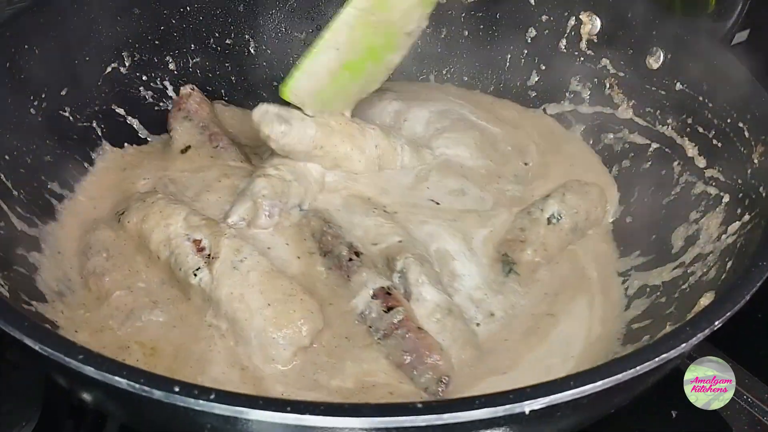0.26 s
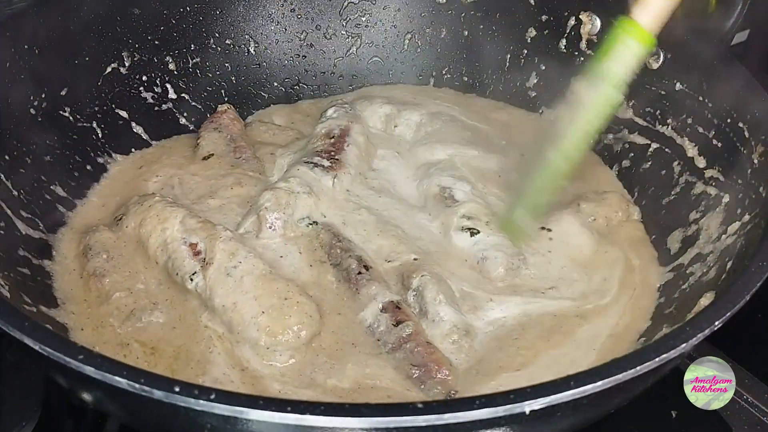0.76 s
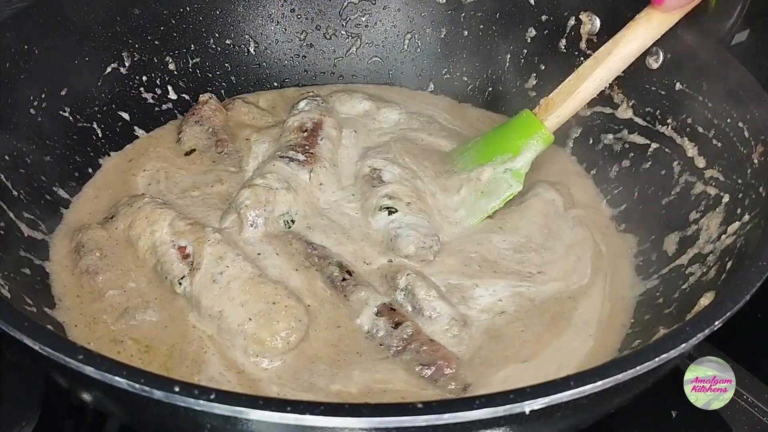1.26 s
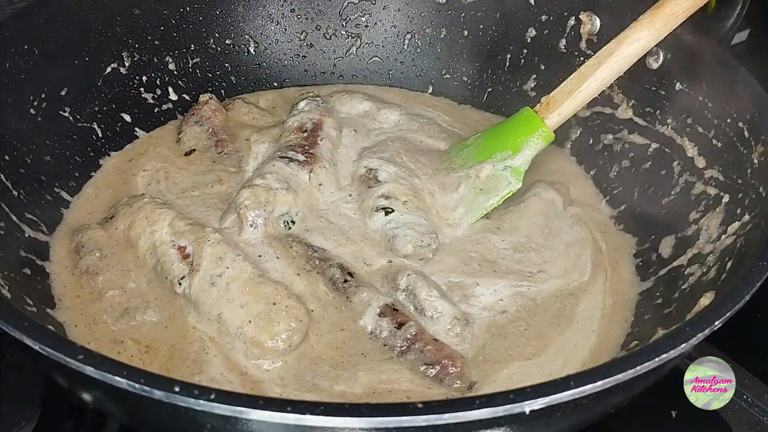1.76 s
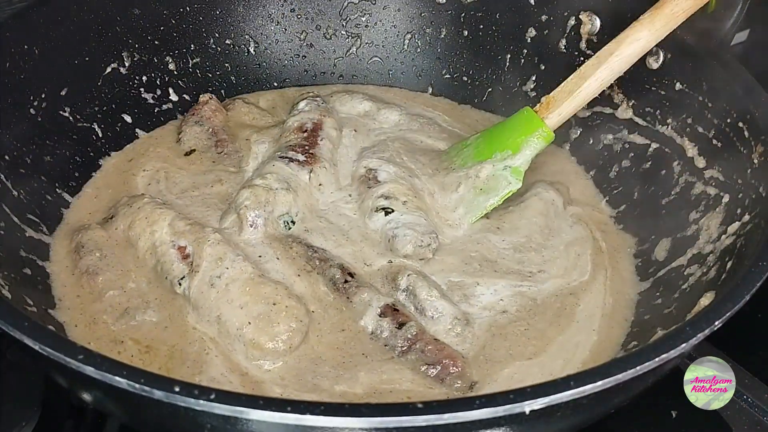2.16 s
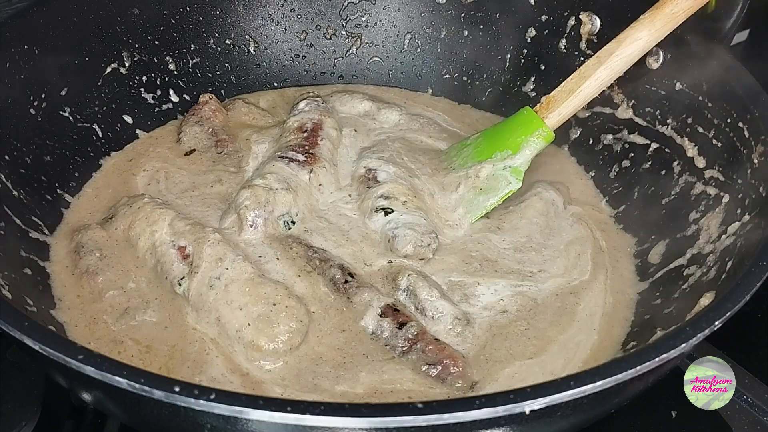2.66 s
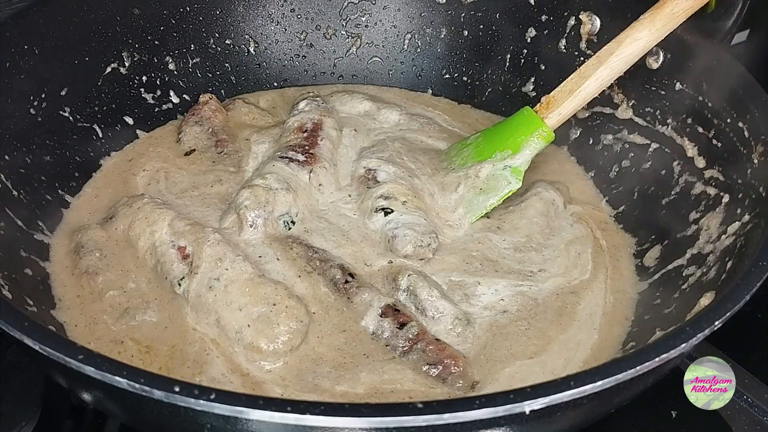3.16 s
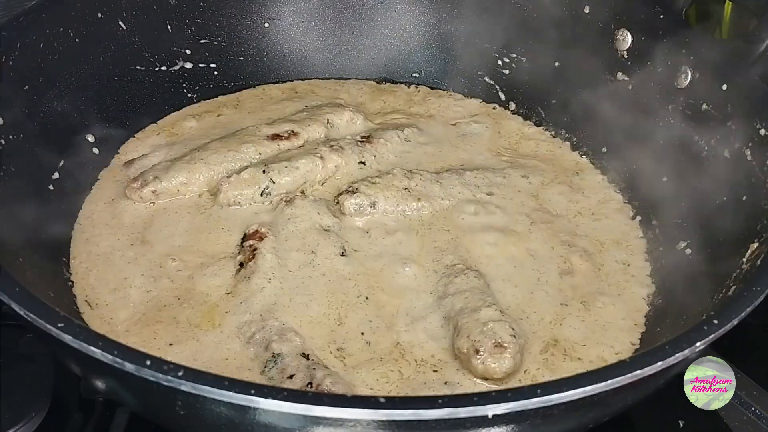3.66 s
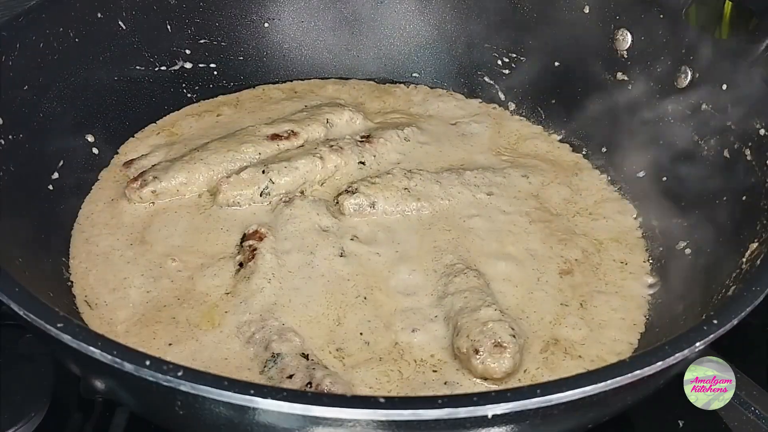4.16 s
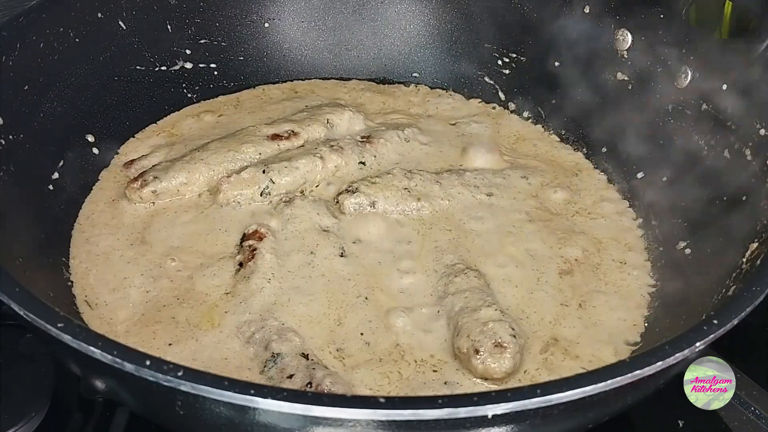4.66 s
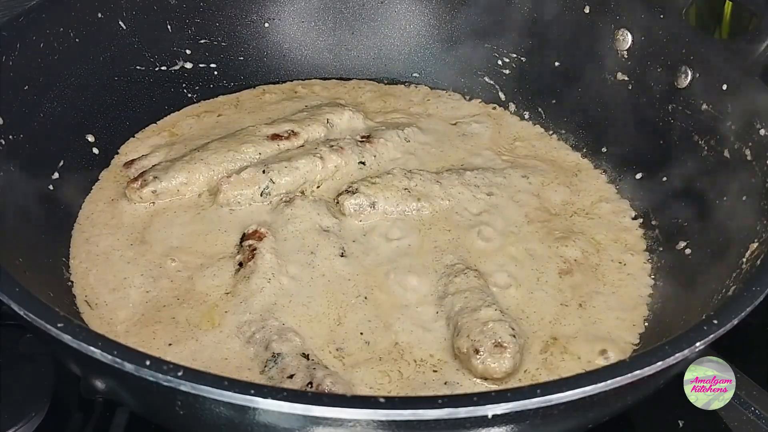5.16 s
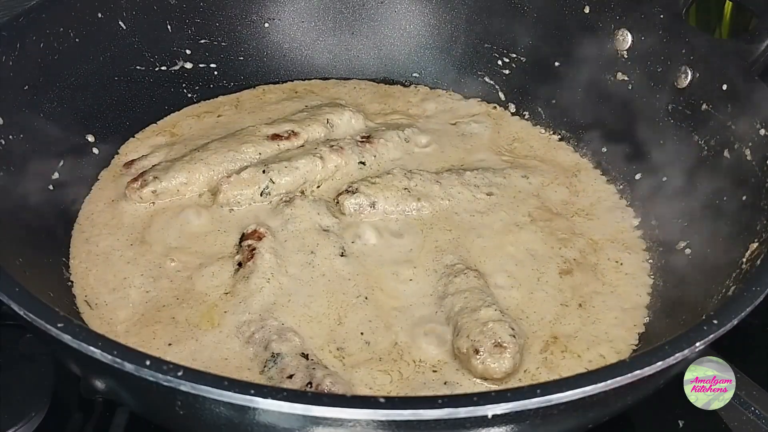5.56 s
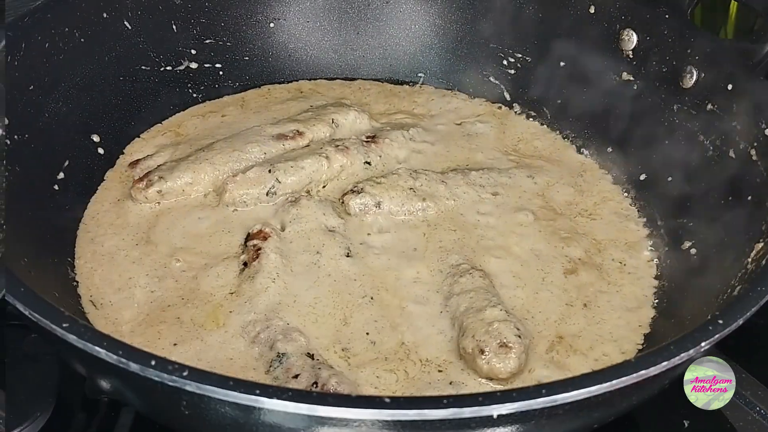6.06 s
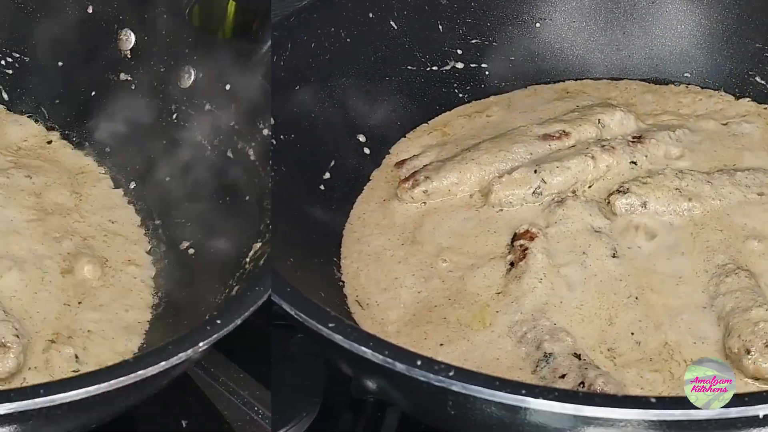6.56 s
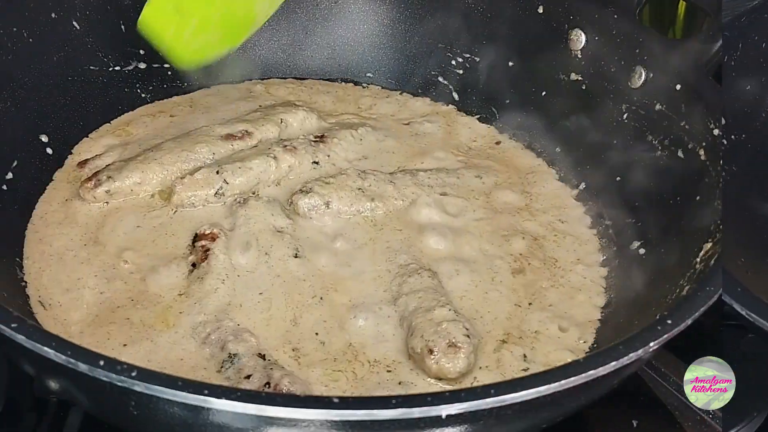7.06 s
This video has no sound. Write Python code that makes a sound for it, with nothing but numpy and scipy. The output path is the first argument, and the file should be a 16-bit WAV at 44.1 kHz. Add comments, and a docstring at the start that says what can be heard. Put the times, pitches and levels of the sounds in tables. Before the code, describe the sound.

Thick sauce heats in a wok on an induction stove. First come a few wet spatula knocks and light ticks, then muffled thumps of vapour and a single bright clink. The sound jumps to a loud, full boil with bursting bubbles and spits, while the stove's fan hums, its coil whines and air rumbles on the nearby microphone. The boil cuts out briefly, then comes back much softer and starts to build.

```python
"""Creamy gravy boils in a wok on an induction hob, in three stretches. First, in wide stereo, a spatula knocks
the wok and is laid down, steam leaks and vapour thumps under the sauce. Then, in mono, a full boil: bursting
bubbles plop, fizz and ring the bowl over the fan's drone and draught and the coil's whine. After a short
silence the sound is much quieter, and the boil picks up."""
import sys
import numpy as np
from scipy import signal
from scipy.io import wavfile
from scipy.ndimage import uniform_filter1d

SR = 44100
rng = np.random.default_rng(int(sys.argv[2]) if len(sys.argv) > 2 else 0)


def digitize_waveform(pressure):
    """Quantize a signal to 16-bit integers and store it at the path in sys.argv[1].

    Rows of a 2-D input are taken as channels; values are limited to [-1, 1].
    """
    field = np.atleast_2d(pressure).T
    bounded = np.clip(field, -1, 1)
    quanta = np.round(bounded * 32767).astype(np.int16)
    wavfile.write(sys.argv[1], SR, quanta)


N = 322306
TIME = np.arange(N) / SR
BOIL_START_S, GAP_START_S, GAP_END_S = 3.288, 6.693, 6.764


def from_db(db):
    """Decibels to gain."""
    return 10 ** (np.asarray(db) / 20)


def unit_rms(x):
    """Scale to rms 1."""
    return x / np.sqrt(np.mean(x ** 2) + 1e-20)


def in_time(rows):
    """Columns of a (t/s, ...) curve at every sample."""
    s, *columns = np.transpose(rows)
    return [np.interp(TIME, s, c) for c in columns]


def at_hz(colour, hz):
    """Level/dB of a spectrum, interpolated in log frequency."""
    points_hz, db = np.transpose(colour)
    return np.interp(np.log(hz), np.log(points_hz), db)


def butter(x, hz, kind, order=2):
    """Causal Butterworth filter."""
    sos = signal.butter(order, np.clip(hz, 5, .48 * SR), kind, fs=SR, output="sos")
    return signal.sosfilt(sos, x + 1e-18)


def drift(rate_hz):
    """Slow random wander, rms 1, drawn every 40 samples."""
    r = np.exp(-80 * np.pi * rate_hz / SR)
    slow = signal.lfilter([1], [1, -2 * r, r * r], rng.standard_normal(N // 40 + 2002))[2000:]
    return np.interp(np.arange(N) / 40, np.arange(len(slow)), unit_rms(slow))


def ring(x, hz, t60_s):
    """One mode: a unit click starts a decaying sine of height 1."""
    r, w = np.exp(-np.log(1000) / (t60_s * SR)), 2 * np.pi * hz / SR
    return signal.lfilter([0, np.sin(w)], [1, -2 * r * np.cos(w), r * r], x + 1e-18)


def resonant_noise(hz, width_hz):
    """Noise through one resonance; rms 1."""
    return unit_rms(ring(rng.standard_normal(N), hz, np.log(1000) / (np.pi * width_hz)))


def gliding_noise(hz, half_width_hz):
    """Narrow noise band following a pitch; rms 1."""
    carrier = np.sin(2 * np.pi * np.cumsum(hz) / SR)
    return unit_rms(butter(rng.standard_normal(N), half_width_hz, "low") * carrier)


def bands(low_hz, high_hz, count):
    """Edges and centres of log-spaced bands."""
    edges = np.geomspace(low_hz, high_hz, count + 1)
    return zip(edges, edges[1:], np.sqrt(edges[1:] * edges[:-1]))


def coloured_noise(colour, count):
    """Noise bands following a spectrum; rms 1."""
    out = np.zeros(N)
    for low, high, hz in bands(colour[0][0], colour[-1][0], count):
        out += from_db(at_hz(colour, hz)) * butter(rng.standard_normal(N), [low, high], "band", order=3)
    return unit_rms(out)


def clicks(rows):
    """One impulse per (t/s, level/dB) row."""
    out = np.zeros(N)
    for s, db in rows:
        out[int(s * SR)] += from_db(db)
    return out


def clack(force, t60_s):
    """Contact rattle: each impulse becomes a decaying noise burst of equal energy."""
    burst = rng.standard_normal(SR) * np.exp(-np.log(1000) * TIME[:SR] / t60_s)
    return signal.fftconvolve(force, burst / np.linalg.norm(burst))[:N]


def spread(mid, side, corner_hz=900, bass_db=-13):
    """Mid and side to stereo: narrow bass, wide treble."""
    treble, bass = butter(side, corner_hz, "high", order=1), butter(side, corner_hz, "low", order=1)
    return mid + (treble + from_db(bass_db) * bass) * [[1], [-1]]


def echoes(x, t60_s):
    """Dense, decaying kitchen reflections; unit-energy response."""
    t = TIME[:SR]
    noise = butter(rng.standard_normal(SR), 17800, "low", order=1)
    tail = noise * np.exp(-np.log(1000) * t / t60_s) * (t > .003)
    return signal.fftconvolve(x, tail / np.linalg.norm(tail))[:N]


def kitchen(x, wet_db, t60_s):
    """Direct sound centred, reflections all around."""
    return spread(x + from_db(wet_db) * echoes(x, t60_s), from_db(wet_db) * echoes(x, t60_s))


def room_tone(rumble_db=-42, tone_db=-73):
    """Kitchen rumble and hiss with a faint, wavering high tone."""
    # room spectrum: f/Hz, density/dB
    colour = [(40, -5.5), (85, 1.5), (140, -23.5), (200, -11), (350, -16.5), (500, -23), (800, -30),
              (1300, -36), (2500, -41.5), (6000, -47), (8500, -56.5), (16000, -49.5)]
    mid, side = coloured_noise(colour, count=20), coloured_noise(colour, count=20)
    rumble = spread(mid, side, corner_hz=690, bass_db=-11)
    tone = spread(resonant_noise(6140, width_hz=160), resonant_noise(6150, width_hz=110))
    return from_db(rumble_db) * rumble + from_db(tone_db) * tone


def draught(gain_db=-2.5, gust_db=1.0):
    """Fan air buffets the microphone in slow eddies."""
    # draught strength: t/s, level/dB
    strength = [(0, -38), (1.8, -42), (1.9, -34.5), (3.2, -36.5), (3.29, -26), (3.55, -20), (3.68, -18.5),
                (4.32, -13.5), (4.72, -20.5), (4.96, -15), (5.52, -21.5), (5.72, -17.5), (6.68, -15),
                (6.77, -32.5), (7.3, -31.5)]
    # eddy spectrum: f/Hz, density/dB
    colour = [(12, -2), (18, 0), (24, 9), (33, -26.5), (48, -14.5), (65, -26), (110, -53)]
    eddies = coloured_noise(colour, count=7)
    local_rms = np.sqrt(uniform_filter1d(eddies ** 2, size=SR // 8) + 1e-9)
    gusts = from_db(in_time(strength)[0] + gain_db + gust_db * drift(5.3))
    return gusts * eddies / local_rms


def whine(throb_hz=100, pull_rad=.12, gain_db=0.5):
    """The induction coil sings; rectified mains makes it throb and pulls its pitch."""
    # coil tones: f/Hz, level/dB
    tones = [(11697, -48.5), (15595.5, -35)]
    mains = 2 * np.pi * throb_hz * TIME
    throb = 1 + .38 * np.cos(mains) + .1 * np.cos(2 * mains) + .1 * np.cos(3 * mains)
    wander_rad = .25 * drift(3) + .05 * drift(120) - pull_rad * np.sin(2 * mains)
    coil = sum(from_db(db + gain_db) * np.sin(2 * np.pi * hz * TIME + wander_rad) for hz, db in tones)
    return np.sqrt(2) * throb * coil


def struck(blows, modes, clack_db, clack_top_hz):
    """Blows on a body; softer contacts excite fewer high modes."""
    force = sum(butter(clicks([(s, db)]), hz, "low", order=1) for s, db, hz in blows)
    body = sum((-1) ** k * from_db(db) * ring(force, hz, t60) for k, (hz, db, t60) in enumerate(modes))
    rattle = butter(clack(force, t60_s=0.049), [700, clack_top_hz], "band", order=3)
    return body + from_db(clack_db) * rattle


def spatula(slap_db=17):
    """The spatula slaps through sauce against the wok, then is laid on the rim and rings hollow."""
    # knocks on the wok: t/s, level/dB, brightness/Hz
    knocks = [(.060, -19, 2800), (.066, -19.5, 870), (0.084, -17.5, 300), (0.1, -25, 250), (.126, -40, 200),
              (0.136, -26, 450), (.199, -28.5, 2000), (.203, -28.5, 600), (.238, -24, 300)]
    # wok modes, damped by the load: f/Hz, level/dB, t60/s
    wok_modes = [(106.5, -19, 0.29), (182.6, -8, 0.22), (220, -3, 0.11), (277, 3, 0.058), (314, -45, 0.1),
                 (415, -13.5, 0.3), (618, -2.5, 0.087), (720, -2.5, 0.082), (920, 4.5, 0.016),
                 (1250, -1, 0.014), (1710, -6, 0.013), (2050, -10, 0.0075), (2450, -15, 0.013),
                 (4370, -7, 0.0077)]
    # contact with the rim: t/s, level/dB, brightness/Hz
    set_down = [(1.314, -30.5, 2100)]
    # spatula modes: f/Hz, level/dB, t60/s
    handle_modes = [(213, -2, 0.63), (366, -1.5, 0.46), (382.4, 0, 0.28), (541, -3.5, 0.095),
                    (930, -8.5, 0.076), (1120, -5, 0.032), (1410, -1, 0.025), (2030, -27, .04)]
    contacts = sum(butter(clicks([(s, db)]), hz, "low") for s, db, hz in knocks)
    slap = from_db(slap_db) * butter(clack(contacts, t60_s=0.077), [1400, 2600], "band")
    wok = struck(knocks, wok_modes, clack_db=11.5, clack_top_hz=4630)
    stir = kitchen(slap + wok, wet_db=-4.5, t60_s=0.57)
    handle = struck(set_down, handle_modes, clack_db=22, clack_top_hz=2440)
    return stir + kitchen(handle, wet_db=-7, t60_s=0.39)


def ticks(edge_ratio=1.35, gain_db=26):
    """The moving spatula ticks against bones and metal."""
    # light contacts: t/s, level/dB, f/Hz
    contacts = [(.099, -54, 9500), (.152, -44, 3500), (.366, -61, 12500), (.466, -57, 6210),
                (.570, -44, 3940), (.589, -50, 2980), (.609, -58, 12500), (0.667, -47.5, 4970),
                (.849, -50, 13000), (.849, -47.5, 3950), (1.148, -58, 10000)]
    out = np.zeros(N)
    for s, db, hz in contacts:
        out += butter(clack(clicks([(s, db)]), t60_s=0.0058), [hz / edge_ratio, hz * edge_ratio], "band")
    return kitchen(from_db(gain_db) * out, wet_db=-4, t60_s=0.083)


def thumps(pitch_hz=210, swell_s=0.0023, gain_db=4.5, slap_db=-17, slap_s=0.018, hum_db=-57):
    """Vapour pockets heave under the sauce: a few low cycles, a dull slap, and the wok hums on."""
    # vapour pockets: t/s, level/dB
    pockets = [(0.395, -30.5), (0.478, -31), (0.66, -33), (0.784, -30), (0.872, -29.5), (1.039, -36),
               (1.14, -29.5), (1.326, -32.5), (1.431, -29), (1.614, -33), (1.717, -32), (1.82, -28.5),
               (2.012, -31.5), (2.112, -30.5), (2.302, -32.5), (2.409, -30), (2.583, -34.5), (2.689, -31),
               (2.869, -34.5), (2.985, -30), (3.085, -29)]
    out, t = np.zeros(N), TIME[:SR // 8]
    swell = (t / swell_s / 2) ** 2 * np.exp(2 - t / swell_s)
    for s, db in pockets:
        hz = pitch_hz * (1 + .025 * rng.standard_normal())
        heave = swell * np.sin(2 * np.pi * hz * t)
        noise = unit_rms(butter(rng.standard_normal(len(t)), [70, 750], "band", order=4))
        slap = from_db(slap_db) * noise * np.exp(-t / slap_s)
        i = int((s - .001) * SR)
        out[i:i + len(t)] += from_db(db + gain_db) * (heave + slap)
    hum = from_db(hum_db) * ring(out, hz=184.8, t60_s=.4)
    return kitchen(out + hum, wet_db=-12, t60_s=0.059)


def leak(whistle_ratio=1.125, whistle_db=-7):
    """Steam slips through a narrowing gap: a gliding hiss with a faint whistle just above."""
    # steam hiss: t/s, f/Hz, level/dB
    glide = [(1.1, 4620, -77), (1.3, 4970, -62), (1.49, 5310, -60.5), (1.74, 4440, -64.5),
             (1.95, 3420, -72)]
    hz, level_db = in_time(glide)
    hiss = gliding_noise(hz, half_width_hz=650)
    whistle = gliding_noise(whistle_ratio * hz, half_width_hz=40)
    flow = from_db(level_db - level_db.max())
    return from_db(level_db) * (hiss + from_db(whistle_db) * flow * whistle)


def clink(crack_db=14):
    """A utensil hits hard: a short crack and bright, quickly damped modes."""
    # contacts of one clink: t/s, level/dB
    contacts = [(2.3035, -31.5), (2.3065, -25), (2.3145, -34.5)]
    # utensil modes: f/Hz, level/dB, t60/s
    modes = [(860, -10, 0.023), (1310, -17, 0.017), (2200, -1.5, 0.059), (2920, 0.5, 0.024),
             (3500, -5.5, 0.023), (4070, -8, 0.032), (4930, -15, 0.017), (5480, -8.5, 0.016),
             (6100, -16, .012), (6900, -16, 0.018), (8900, -17, .01), (12700, -13, 0.0088),
             (14700, -14, .008)]
    force = clicks(contacts)
    body = sum(from_db(db) * ring(force, hz, t60) for hz, db, t60 in modes)
    crack = from_db(crack_db) * butter(clack(force, t60_s=0.034), [1500, 7200], "band")
    return kitchen(body + crack, wet_db=-5, t60_s=.6)


def fan():
    """The fan drones in the resonances of the hob's case."""
    # case resonances: f/Hz, width/Hz, level/dB
    modes = [(79.8, 5.8, -33.5), (104.5, 8.9, -37.5), (187, 14.7, -39), (263, 7.3, -44), (509, 8.4, -43)]
    return sum(from_db(db) * resonant_noise(hz, width) for hz, width, db in modes)


def vigour(rise_db_per_s=12.5):
    """Plop and fizz level/dB per sample: steady at full boil, low but rising after the gap."""
    quiet, rise_db = TIME > GAP_START_S, rise_db_per_s * (TIME - GAP_END_S)
    return np.where(quiet, -49 + rise_db, -32), np.where(quiet, -52 + rise_db, -37)


def boil(per_s_at_1khz=130, size_db=3, t60_cycles=20, cluster_db=4, wash_db=-6, flicker_db=1):
    """Bubbles burst in clusters: few large low plops, many small bright ones, a wash of the tiniest."""
    # boil spectrum: f/Hz, density/dB
    colour = [(130, -23.5), (250, 1.5), (420, -7), (550, 1.5), (900, -6), (1500, -7), (2200, -11.5),
              (3400, -12), (5800, -11), (9500, -19.5), (12000, -20), (15000, -26)]
    plops, fizz = np.zeros(N), np.zeros(N)
    clusters = from_db(cluster_db * drift(20))
    for low, high, hz in bands(135.5, 15500, count=30):
        bursts = rng.random(N) < clusters * per_s_at_1khz * (hz / 1000) ** .55 / SR
        sizes = from_db(size_db * np.minimum(rng.exponential(1, N), 4))
        signs = np.sign(rng.random(N) - .5)
        grains = unit_rms(butter(ring(bursts * sizes * signs, hz, t60_cycles / hz), hz / 2, "high"))
        wash = unit_rms(butter(rng.standard_normal(N), [low, high], "band"))
        gain = np.sqrt(high - low) * from_db(at_hz(colour, hz) + flicker_db * drift(24))
        band = gain * (grains + from_db(wash_db) * wash)
        fizz_share = np.clip(np.log2(hz / 1700), 0, 1)
        plops += (1 - fizz_share) * band
        fizz += fizz_share * band
    plop_db, fizz_db = vigour()
    plops /= butter(plops, [300, 2000], "band").std()
    fizz /= butter(fizz, [3000, 10000], "band").std()
    bubbles = from_db(plop_db) * plops + from_db(fizz_db) * fizz
    return bubbles + from_db(-13) * echoes(bubbles, t60_s=0.081)


def bowl(x, direct_db):
    """Bursts in the sauce ring in the bowl of the wok."""
    # bowl resonances: f/Hz, width/Hz, gain/dB
    modes = [(259, 36, -9), (342.6, 15, 3.5), (381, 19, -13.5), (496, 15.4, 1.5), (583, 18, -16),
             (730, 27, -6.5), (956, 22, -2), (1455, 166, -11), (2030, 68, -8), (2617, 190, -4)]
    out = from_db(direct_db) * x
    for hz, width, db in modes:
        out += from_db(db) * signal.lfilter(*signal.iirpeak(hz, hz / width, fs=SR), x)
    return out


def lesser_pops(per_s=9, offset_db=-4, scatter_db=.5, low_hz=478, high_hz=7250, octaves=.21, rise_s=.0068):
    """Rows for pops(): random lesser bubbles that follow the plop level."""
    length_s = TIME[-1] - BOIL_START_S
    when, size, pitch = rng.random((int(per_s * length_s), 3)).T
    times_s = BOIL_START_S + when * length_s
    levels_db = np.interp(times_s, TIME, vigour()[0]) + offset_db + scatter_db * (2 * size - 1)
    pitches_hz = low_hz * (high_hz / low_hz) ** pitch
    return [(s, db, hz, octaves, rise_s) for s, db, hz in zip(times_s, levels_db, pitches_hz)]


def pops(grain_db=3, swell_cycles=0.14, gain_db=-2):
    """Each burst is a quick swell of uneven droplets around one pitch; big, low bubbles open slower."""
    # largest bubbles and steam spits: t/s, level/dB, f/Hz, half-width/octaves, rise/s
    largest = [(3.338, -24, 2480, 0.88, 0.012), (3.607, -18.5, 5900, 0.43, 0.0087),
               (3.754, -27, 2440, 0.42, 0.0067), (3.872, -23, 2660, .23, 0.0081),
               (3.968, -29.5, 2100, 0.26, 0.0073), (3.989, -23, 540, 0.17, 0.0045),
               (4.036, -25, 1900, 0.26, .009), (4.15, -26, 11400, 0.27, .024),
               (4.282, -27.5, 1700, .3, 0.0095), (4.376, -17.5, 248, 0.78, 0.0083),
               (4.381, -22.5, 1800, 1.46, 0.0045), (4.602, -24, 110, 0.54, .012),
               (4.673, -25.5, 252, 0.24, 0.0068), (4.777, -27, 4170, 0.74, .008),
               (5.051, -28.5, 2520, 0.41, 0.0088), (5.082, -23, 510, 0.27, 0.014),
               (5.335, -27, 5000, 0.84, 0.012), (5.368, -21.5, 1340, 0.78, 0.0099),
               (5.41, -24.5, 1400, 0.21, 0.007), (5.496, -28.5, 6700, 0.26, 0.0068),
               (5.835, -24, 650, 0.77, .016), (5.888, -29, 3200, 0.46, 0.0091),
               (6.022, -29, 2450, 0.1, 0.0029), (6.085, -27, 2750, 0.35, 0.0069),
               (6.216, -28.5, 5670, 0.28, 0.014), (6.266, -20, 1500, 0.7, 0.0029),
               (6.269, -25.5, 5450, 0.25, 0.0065), (6.503, -25.5, 1080, 0.77, 0.012),
               (6.51, -27.5, 6000, 0.46, 0.0098), (7.036, -31.5, 860, .35, 0.0025),
               (7.074, -39, 2980, 0.22, .004), (7.285, -31.5, 4000, 1.2, .007)]
    out, t = np.zeros(N + SR), TIME[:SR // 4]
    for s, db, hz, octaves, rise_s in list(largest) + lesser_pops():
        noise = rng.standard_normal(len(t))
        grain = from_db(grain_db * np.repeat(rng.standard_normal(len(t)), 40)[:len(t)])
        droplets = butter(noise * grain, [hz / 2 ** octaves, hz * 2 ** octaves], "band")
        age = t / (rise_s + swell_cycles / hz)
        swell = age * np.exp(1 - age)
        splatter = unit_rms(swell * droplets) * swell.std()
        i = int(s * SR)
        out[i:i + len(t)] += from_db(db + gain_db) * splatter
    return out[:N]


def singing():
    """Steam at the edge of the boil holds a breathy pitch for half a second."""
    # steam note: t/s, f/Hz, level/dB
    note = [(4.84, 1897, -71), (4.92, 1970, -37), (5.15, 1974, -41), (5.36, 2000, -39.5), (5.44, 1960, -76)]
    hz, level_db = in_time(note)
    return from_db(level_db) * gliding_noise(hz, half_width_hz=93)


def scene(early_whine_db=-36, late_whine_db=-17, late_fan_db=-14, boil_room_db=1):
    """Quiet stirring in stereo, then the boil in mono, broken by a short silence."""
    early, late = TIME < BOIL_START_S, TIME > GAP_END_S
    loud = ~early & (TIME < GAP_START_S)
    room = room_tone()
    stirring = room + spatula() + ticks() + clink() + thumps() + spread(leak(), leak())
    boiling = bowl(boil() + pops(), direct_db=-1) + singing() + from_db(boil_room_db) * room.mean(axis=0)
    hob = fan() * (loud + late * from_db(late_fan_db))
    coil = whine() * (loud + early * from_db(early_whine_db) + late * from_db(late_whine_db))
    return early * stirring + (loud | late) * boiling + hob + coil + (early | loud | late) * draught()


def record(dry):
    """Steep elliptic low-pass."""
    cutoff_hz = 15760
    return signal.sosfilt(signal.ellip(12, .1, 70, cutoff_hz, fs=SR, output="sos"), dry)


dry = scene()
out = record(dry)
digitize_waveform(out)
```